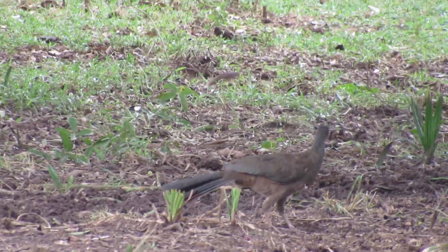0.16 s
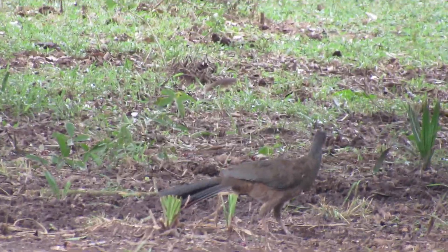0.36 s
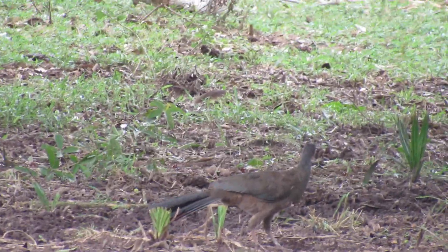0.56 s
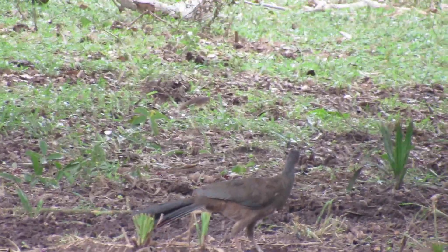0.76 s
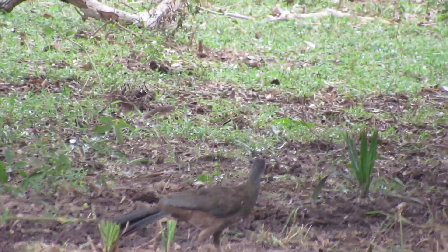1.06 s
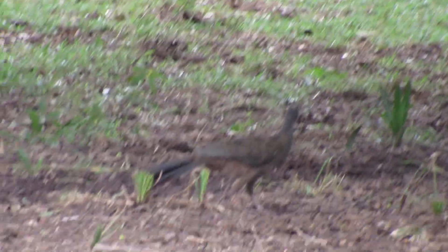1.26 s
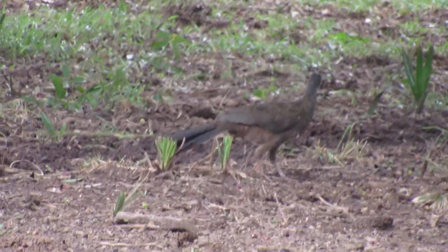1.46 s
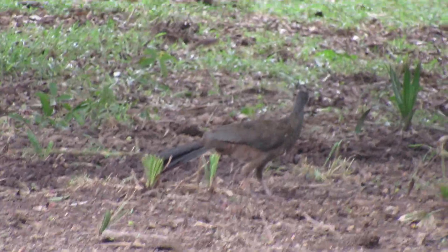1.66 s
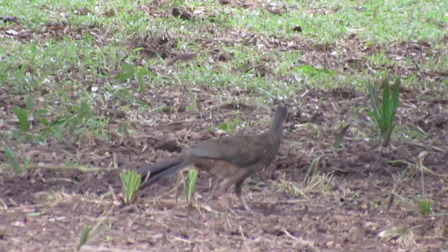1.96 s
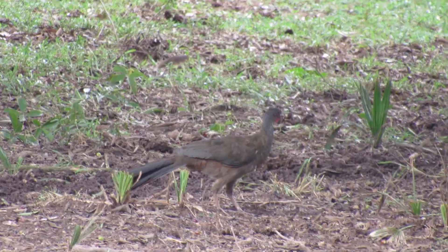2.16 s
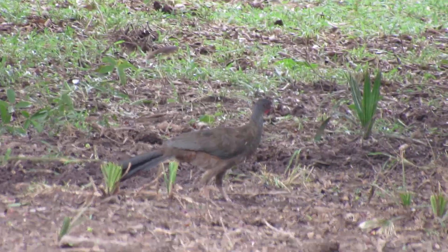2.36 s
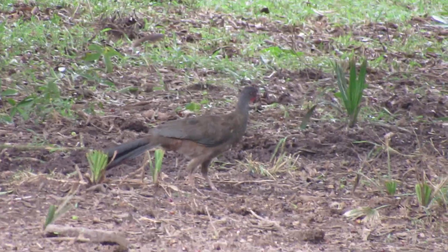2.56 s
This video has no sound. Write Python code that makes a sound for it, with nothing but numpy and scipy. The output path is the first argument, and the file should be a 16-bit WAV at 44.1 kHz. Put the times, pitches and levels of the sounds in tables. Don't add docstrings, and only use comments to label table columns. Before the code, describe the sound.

Harsh, raspy fowl calls start at once with a high voice; from about 0.35 to 0.7 s high and low voices overlap in quick bursts. After a short gap they resume from 1.05 to 2.1 s, strongest around 1.7 to 2 s, then fade. Thin sliding whistles and distant chirps slip between, clearest near 1.75 and 2.2 s. Wind thumps low throughout over soft air noise, faint insect hiss and light tree echoes.

```python
import sys
import numpy as np
from scipy import signal
from scipy.fft import rfft, irfft, next_fast_len
from scipy.io import wavfile
from scipy.ndimage import map_coordinates

SR = 44100
rng = np.random.default_rng(int(sys.argv[2]) if len(sys.argv) > 2 else 0)


def master(y):
    cut = np.clip(np.atleast_2d(y).T, -1, 1)
    pcm = np.round(cut * 32767)
    wavfile.write(sys.argv[1], SR, pcm.astype(np.int16))


def volts_from_db(level):
    exponent = np.asarray(level, float) / 20
    return 10 ** exponent


N = 119070

# start_s, length_s, level_db, pitch_hz, throat_stretch [ratio]
HIGH_CALLS = [(.0, 0.26, -54, 803, 1.09), (.338, 0.1064, -45.5, 735.7, 0.906),
              (.457, .045, -59.5, 719, 0.87), (.536, 0.066, -39.5, 800.6, 1.06),
              (.66, 0.24, -60.5, 797, 0.97), (1.05, 0.016, -59, 794, 1.01), (1.07, 0.033, -46.5, 837.6, 1),
              (1.13, 0.1, -45, 816, 1.036), (1.36, 0.095, -42, 798, 0.98), (1.478, 0.104, -43, 773, 1),
              (1.705, 0.11, -39.5, 816, 0.99), (1.866, 0.11, -46.5, 732, 0.89),
              (1.96, 0.12, -44, 774.7, 1.02), (2.12, 0.34, -63.5, 748, 1.01)]
LOW_CALLS = [(.378, 0.033, -47, 452, 0.72), (.516, 0.1143, -47.5, 442.6, 0.787),
             (1.118, 0.1645, -45.5, 400, 0.766), (1.618, 0.038, -42, 495.5, 1.045),
             (1.655, 0.062, -43, 515.8, 0.94), (1.745, 0.053, -50, 520, 1.32),
             (.345, 0.1, -64.5, 430, 2.63), (0.52, 0.032, -72, 520, 1.84), (1.495, 0.072, -68.5, 390, 2.55),
             (1.325, .14, -47.5, 410, 0.84), (.52, .1, -58.5, 430, 1.71), (1.165, 0.11, -63.5, 510, 1.7),
             (1.338, .085, -63, 400, 1.58), (1.43, .13, -63.5, 310, 1.49), (1.93, .15, -60.5, 440, 1.93),
             (.38, .09, -64.5, 420, 1.43)]
# scoop [share of pitch climbed at the start], brightness [dB/octave], swell_db over the call
HIGH_MANNERS = [(0.0303, -0.5, -11), (0.2017, -11.5, 2.5), (0.042, 6, -38), (-0.04, -6, 0), (.01, -10, 11),
                (-0.0072, -13, 0), (0.02, -8, -12), (0.052, -7, -2), (0.01, -10.5, -10), (0.084, -11, -5.5),
                (0.0334, -7.5, -4.5), (0.29, 3, 0), (-0.019, -11.5, -2), (0.0092, 15, -4)]
LOW_MANNERS = [(0.041, -18, -6), (0.017, -6, 6), (0.0472, -5.5, -14.5), (.19, -6.5, 5), (0.0647, -2, 0),
               (0.0188, 12.5, -7), (0.02, -5, -6), (0.018, -4, 9), (0.023, 13, -1), (.03, -6.5, -3.5),
               (0.028, -8, -5), (0.029, -1, 8), (.03, -11, -1.5), (0.031, -7, -3), (.03, 0, -1),
               (0.031, -4, -4)]
HIGH_ROUGHNESS = [.6, .6, .9, .25, .7, .7, .15, .7, .7, .7, .75, .2, .7, .8]
LOW_ROUGHNESS = [.45, .9, .85, .15, .7, .9, 1, .9, .9, .9, 1, 1, 1, 1, 1, 1]
# centre_hz, width_hz, level_db
HIGH_RESONANCES = [(773, 210, -26.5), (1553, 201, 1.5), (2450, 680, -9), (3450, 350, -26),
                   (4350, 560, -27.5), (6500, 3500, -31)]
LOW_RESONANCES = [(933, 95, -8.5), (1448, 437, -1.5), (1950, 227, 9.5), (2550, 408, 2), (3700, 1300, -16),
                  (4700, 170, -18.5), (6300, 3000, -23)]
# time_s, level_db
WIND_STRENGTH = [(0.0, -56.5), (0.17, -47.5), (0.37, -39), (0.5, -38.5), (0.77, -38), (1.07, -54),
                 (1.17, -40), (1.32, -40.5), (1.92, -38), (2.17, -36), (2.43, -46.5), (2.7, -50)]
# time_s, peak_db
WIND_PUFFS = [(0.041, -35), (0.191, -29), (0.248, -27), (0.287, -19.5), (0.336, -21.5), (0.406, -23.5),
              (0.498, -27.5), (0.549, -64), (0.626, -15.5), (0.662, -19), (0.689, -40), (0.757, -28),
              (0.811, -18), (0.962, -18.5), (1.001, -23), (1.072, -14), (1.149, -20.5), (1.23, -15.5),
              (1.32, -22.5), (1.377, -29.5), (1.526, -18), (1.656, -17.5), (1.755, -22.5), (1.849, -33.5),
              (1.973, -16), (2.04, -21.5), (2.117, -44), (2.197, -23), (2.31, -31), (2.407, -26.5)]
# frequency_hz, density [dB per Hz]
RUMBLE_SPECTRUM = [(12, -46), (30, -7.5), (50, 6.5), (90, 7.5), (140, -0.5), (220, -22), (400, -74),
                   (900, -120)]
PUFF_SPECTRUM = [(40, -46), (100, 5.5), (150, -0.5), (250, -14), (400, -36.5), (700, -92), (1400, -120)]
AIR_SPECTRUM = [(100, 8), (300, 14), (900, -2.5), (1600, -4.5), (3000, -16), (4000, -15.5), (11000, -21),
                (13000, -26.5)]
# frequency_hz, likeness [0 to 1]
AIR_COHERENCE = [(300, .9), (1500, .8), (3000, .7), (7000, .3), (12000, .1)]
# start_s, length_s, level_db, from_hz, to_hz
WHISTLES = [(.103, 0.047, -52.5, 2650, 2175), (0.277, 0.14, -66, 1950, 2550),
            (0.292, 0.062, -69, 6200, 6940), (0.446, 0.086, -50.5, 1950, 2240),
            (.612, 0.106, -47, 2520, 2463), (0.718, 0.07, -50.5, 2265, 2053), (1.27, 0.17, -66, 7800, 8100),
            (1.712, 0.054, -37.5, 2400, 2580), (1.713, 0.034, -51, 3600, 3760),
            (1.74, 0.033, -43.5, 3370, 3200), (1.778, 0.039, -39, 2760, 2450),
            (1.98, 0.092, -46, 2400, 2680), (2.145, 0.028, -60, 2790, 2750), (2.18, 0.041, -46, 2760, 2450),
            (2.222, 0.016, -50.5, 2300, 2115)]
CHATTER = [(.38, .035, -51, 903, 870), (.382, .045, -48, 1790, 1560), (1.678, .014, -42, 2120, 2060),
           (1.748, 0.055, -47, 1238, 1204), (.52, 0.021, -43, 2580, 2790), (.535, .02, -42, 2616, 2496),
           (.552, 0.015, -43, 2770, 2740), (.562, 0.0366, -47.5, 2392, 2550),
           (.586, 0.027, -43.5, 2720, 2585), (.548, 0.011, -59, 4300, 4320),
           (.6, 0.014, -52, 4250, 4220), (1.152, 0.044, -50, 2700, 2826),
           (1.228, 0.048, -52.5, 1895, 2050), (1.332, 0.021, -48, 2550, 2715),
           (1.352, 0.045, -49.5, 2380, 2335), (1.408, .022, -47, 1830, 2130),
           (1.418, 0.026, -51, 2390, 2670), (1.45, 0.014, -51, 2350, 2120),
           (1.496, 0.021, -52, 1900, 1930), (1.495, 0.064, -58, 4450, 4290),
           (1.655, 0.019, -41, 1993, 2090), (1.69, .026, -44, 2110, 1830),
           (1.886, 0.098, -55, 3570, 3620), (1.886, 0.047, -57.5, 4180, 4330),
           (1.95, 0.023, -52, 4300, 4280), (1.945, 0.032, -49, 2820, 2720),
           (1.93, .03, -30, 1608, 1528), (2.035, 0.021, -45, 1900, 1950)]
# frequency_hz, t60_s
TREE_DECAY = [(500, 1), (1600, 0.85), (3000, 0.59), (8000, 0.34)]
# frequency_hz, left_lead [rad]
PORT_LEAD = [(300, 3.2), (800, 1.985), (1300, 1.48), (2240, 0.48), (4000, 0.52), (7000, 1.76), (12000, 1.9)]
# frequency_hz, left_minus_right_db
PORT_TILT = [(100, -2.6), (600, -2.4), (1400, .9), (2300, .3), (4200, -2.8), (12000, -1.3)]

ATTACK_S, RELEASE_S = .008, .013
SCOOP_S, SAG = .025, .045
JITTER, WANDER, PARTIAL_DB, HALF_LINES, BREATH = .04, .045, 10, 1.1, .8
HIGH_FLUTTER_DB, LOW_FLUTTER_DB = 4, 1.2
BRIGHT_TOP_HZ = 3000
VALLEY_HZ, VALLEY_WIDTH_HZ, VALLEY_DEPTH = 3350, 400, .75
PUFF_LAG_S, PUFF_S, PUFF_DB, PORT_DB = 0.019, 0.016, 11.5, 12.5
SHARP_DB, SHARP_GROWS = -5.5, 1.43
AIR_DB, INSECT_DB, INSECT_PULSE_DB = -46.5, -65.5, 2.2
INSECT_HZ, INSECT_WIDTH_HZ = 4690, 170
WHISTLE_BEND, THIRD_DB = 1.7, -30
TREES_DB, WHISTLE_ECHO_DB = -9.5, -7
NOTCH_HZ, NOTCH_WIDTH_HZ, NOTCH_DEPTH = 690, 75, .8
TOP_HZ, TOP_WIDTH_HZ, TOP_DB = 13400, 250, -10.5


def unit(x):
    return x / np.sqrt(np.mean(x ** 2) + 1e-20)


def along(points, hz):
    f, v = np.transpose(points)
    return np.interp(np.log(hz + 1), np.log(f + 1), v)


def wobble(rate):
    knots = rng.standard_normal(int(N * 800 / SR) + 4)
    return map_coordinates(knots, [np.arange(N) * min(rate, 799) / SR])


def filtered(x, response):
    m = next_fast_len(N + SR // 2)
    return irfft(rfft(x, m) * response(np.fft.rfftfreq(m, 1 / SR)), m)[..., :N]


def coloured(spectrum, channels=1):
    noise = rng.standard_normal((channels, N))
    return unit(filtered(noise, lambda hz: volts_from_db(along(spectrum, hz))))


def shape(t, length):
    return np.clip(np.minimum(t / ATTACK_S, (length - t) / RELEASE_S + 1), 0, 1) ** 2


def throat_response(hz, throat):
    tract = 0
    for k, (centre, width, level_db) in enumerate(throat):
        damping = 1j * hz * width
        tract = tract + (-1) ** k * volts_from_db(level_db) * damping / (centre ** 2 - hz ** 2 + damping)
    tract = tract * (1 - VALLEY_DEPTH * np.exp(-((hz - VALLEY_HZ) / VALLEY_WIDTH_HZ) ** 2))
    octaves = np.log2(np.minimum(hz, BRIGHT_TOP_HZ) / throat[1][0])
    return tract, octaves


def voice(calls, manners, roughnesses, throat, flutter_db):
    out = np.zeros(N + SR)
    shake, drift, flutter = unit(wobble(260)), unit(wobble(45)), unit(wobble(65))
    air = rng.standard_normal(N)
    sway = np.array([unit(wobble(70)) for _ in range(8)])
    for call, manner, rough in zip(calls, manners, roughnesses):
        start, length, db, hz, stretch = call
        scoop, bright_db, swell_db = manner
        at = max(round(start * SR), 0)
        t = np.arange(min(round((length + RELEASE_S) * SR), N - at)) / SR
        part = slice(at, at + len(t))

        glide = 1 - scoop * np.exp(-t / SCOOP_S) - SAG * rough * (t / length) ** 2
        unsteady = 1 + rough * (JITTER * shake[part] + WANDER * drift[part])
        phase = 2 * np.pi * np.cumsum(hz * glide * unsteady) / SR

        order = np.arange(1, int(SR / 4 / hz))
        strengths = volts_from_db(PARTIAL_DB * np.sqrt(rough) * sway[order % len(sway), part] / 2)
        pulses = unit((strengths * np.cos(order[:, None] * phase)).sum(0))
        pulses = pulses * (1 + HALF_LINES * rough * np.cos(phase / 2))
        pulses = pulses + BREATH * rough * air[part] * (1 + np.cos(phase))
        loudness_db = flutter_db * rough * flutter[part] + swell_db * t / length
        blown = shape(t, length) * volts_from_db(loudness_db) * pulses

        m = next_fast_len(len(t) + SR // 20)
        tract, octaves = throat_response(np.fft.rfftfreq(m, 1 / SR) / stretch + 1, throat)
        sung = unit(irfft(rfft(blown, m) * tract * volts_from_db(bright_db * octaves), m))
        out[at:at + m] += volts_from_db(db) * sung * np.sqrt(m / len(t))
    return out[:N]


def wind():
    t = np.arange(N) / SR
    times, levels = np.transpose(WIND_STRENGTH)
    push = volts_from_db(np.interp(t, times, levels) + 1.3 * wobble(25.07))
    for peak_s, peak_db in WIND_PUFFS:
        push = push + volts_from_db(peak_db - PUFF_DB) * np.exp(-((t - peak_s - PUFF_LAG_S) / PUFF_S) ** 2)
    sharp = push * volts_from_db(SHARP_DB) * unit(push) ** (SHARP_GROWS - 1)
    common, apart = push * coloured(RUMBLE_SPECTRUM, channels=2) + sharp * coloured(PUFF_SPECTRUM, channels=2)
    return volts_from_db(PORT_DB) * np.array([common + 0.12 * apart, common - 0.16 * apart])


def far_air():
    def mid_side(hz):
        turn = np.arccos(np.clip(along(AIR_COHERENCE, hz), -1, 1)) / 2
        return np.array([np.cos(turn), np.sin(turn)])

    mid, side = filtered(coloured(AIR_SPECTRUM, channels=2), mid_side)
    return volts_from_db(AIR_DB + wobble(4.85) / 2) * np.array([mid + side, mid - side])


def insect():
    noise = rng.standard_normal((2, N))
    band = filtered(noise, lambda hz: np.exp(-((hz - INSECT_HZ) / INSECT_WIDTH_HZ) ** 2))
    hiss = unit(band[0] + 0.11 * band[1] * np.array([[1], [-1]]))
    return hiss * volts_from_db(INSECT_DB + INSECT_PULSE_DB * (wobble(44.88) + wobble(6.13) / 2))


def whistler(notes, waver_db, waver, rate):
    out = np.zeros(N + SR)
    shake = np.pad(unit(wobble(rate)), (0, SR))
    for start, length, db, start_hz, end_hz in notes:
        at = round(start * SR)
        t = np.arange(round((length + RELEASE_S) * SR)) / SR
        bend = WHISTLE_BEND if end_hz < start_hz else 1
        glide = start_hz + (end_hz - start_hz) * (t / length) ** bend
        phase = 2 * np.pi * np.cumsum(glide * (1 + waver * shake[at:][:len(t)])) / SR
        tone = np.sin(phase) + volts_from_db(THIRD_DB) * np.sin(3 * phase)
        out[at:][:len(t)] += volts_from_db(db) * shape(t, length) * tone
    return out[:N] * volts_from_db(waver_db * wobble(60.87))


def trees(x):
    hz, t, z = signal.stft(rng.standard_normal((2, SR)), SR, nperseg=256)
    decay = volts_from_db(-60 * t / along(TREE_DECAY, hz)[:, None])
    a, b = signal.istft(z * decay, SR, nperseg=256)[1]
    tail = np.array([a + 0.08 * b, a - 0.87 * b]) / np.linalg.norm(a)
    delayed = np.pad(x, (400, 0))
    return signal.fftconvolve(delayed[None], tail, axes=1)[:, :N]


def scene():
    fowl = voice(HIGH_CALLS, HIGH_MANNERS, HIGH_ROUGHNESS, HIGH_RESONANCES, HIGH_FLUTTER_DB)
    fowl = fowl + voice(LOW_CALLS, LOW_MANNERS, LOW_ROUGHNESS, LOW_RESONANCES, LOW_FLUTTER_DB)
    thin = whistler(WHISTLES, waver_db=2, waver=.004, rate=150)
    fowl = fowl + whistler(CHATTER, waver_db=4, waver=.02, rate=420)
    echoes = volts_from_db(TREES_DB) * trees(fowl + volts_from_db(WHISTLE_ECHO_DB) * thin)
    return fowl + thin + echoes + wind() + far_air() + insect()


def roll_off(x):
    return signal.sosfilt(signal.butter(12, 14300, fs=SR, output="sos"), x)


def record(dry):
    side = np.array([[.5], [-.5]])

    def port_response(hz):
        notch = 1 - NOTCH_DEPTH * np.exp(-((hz - NOTCH_HZ) / NOTCH_WIDTH_HZ) ** 2)
        top = volts_from_db(TOP_DB / (1 + np.exp((TOP_HZ - hz) / TOP_WIDTH_HZ)))
        tilt = volts_from_db(side * along(PORT_TILT, hz))
        return notch * top * tilt * np.exp(1j * side * along(PORT_LEAD, hz))

    return roll_off(filtered(dry, port_response))


dry = scene()
out = record(dry)
master(out)
```